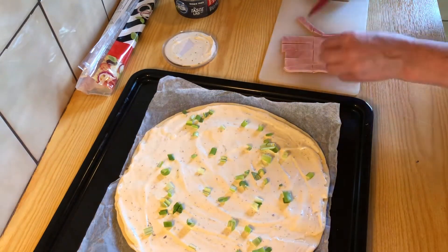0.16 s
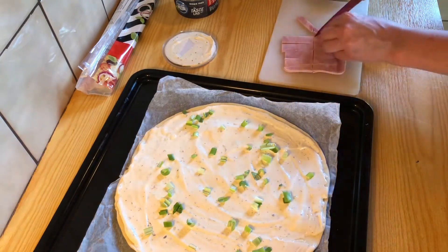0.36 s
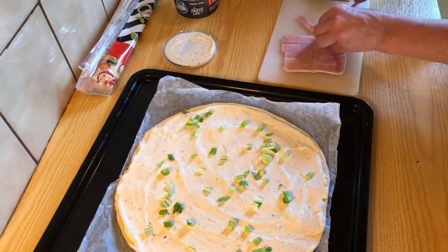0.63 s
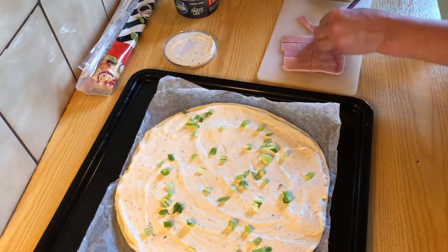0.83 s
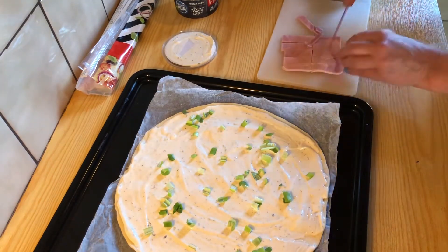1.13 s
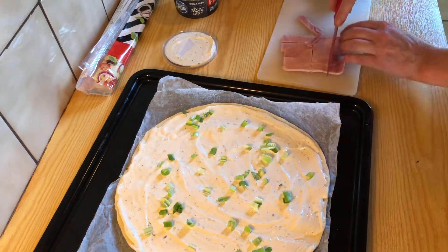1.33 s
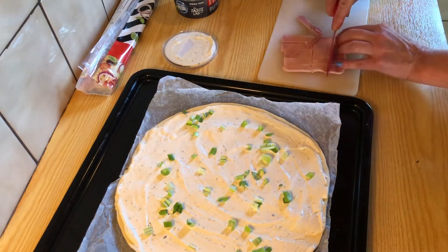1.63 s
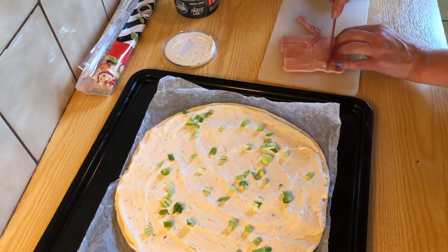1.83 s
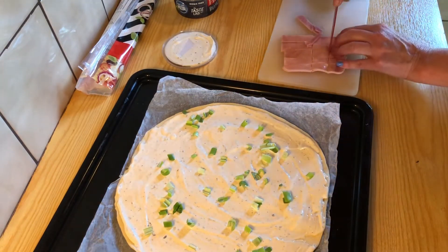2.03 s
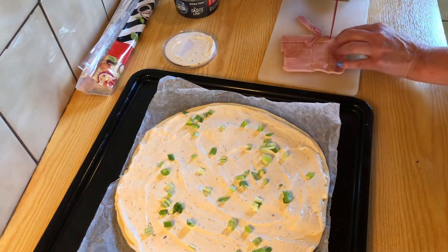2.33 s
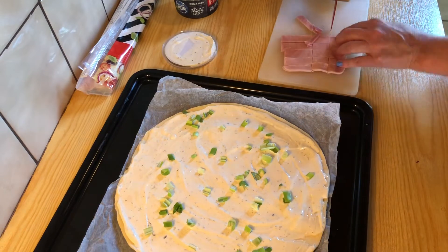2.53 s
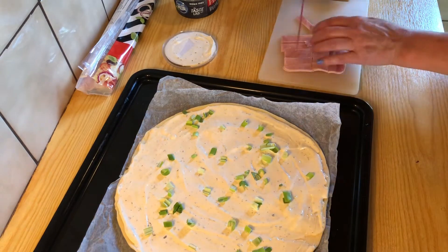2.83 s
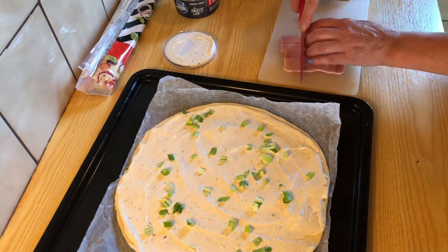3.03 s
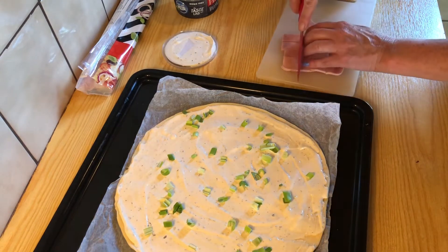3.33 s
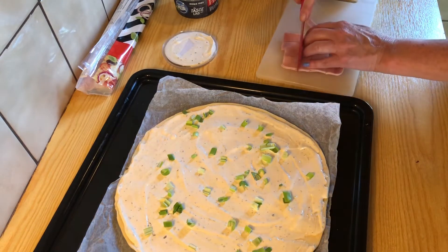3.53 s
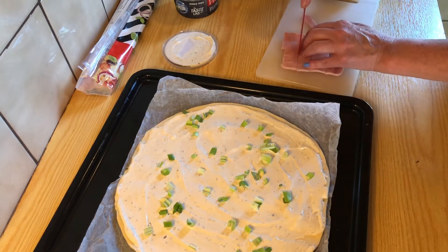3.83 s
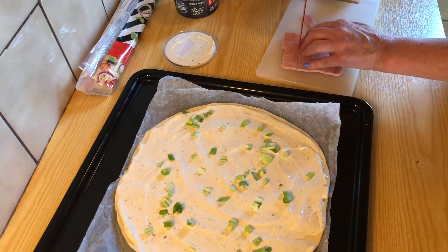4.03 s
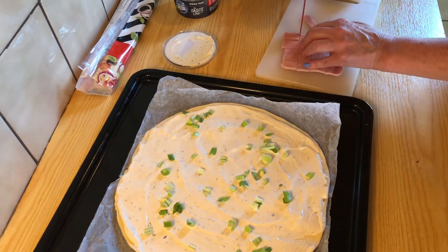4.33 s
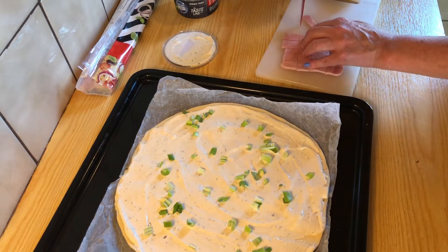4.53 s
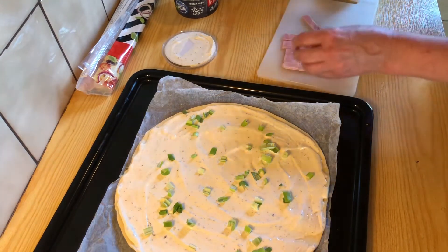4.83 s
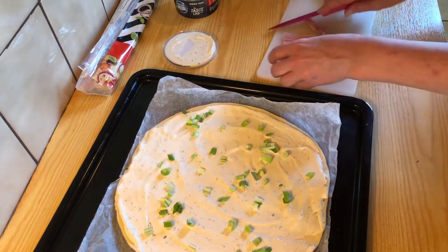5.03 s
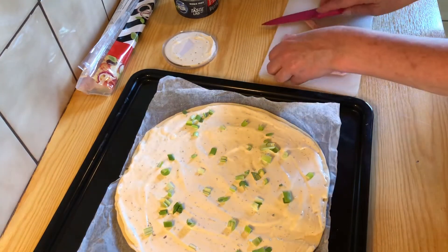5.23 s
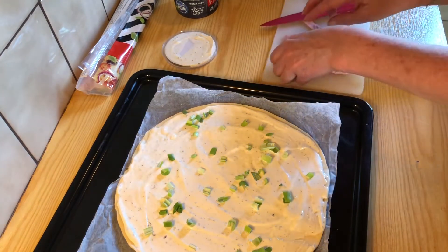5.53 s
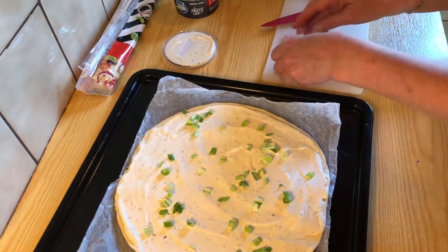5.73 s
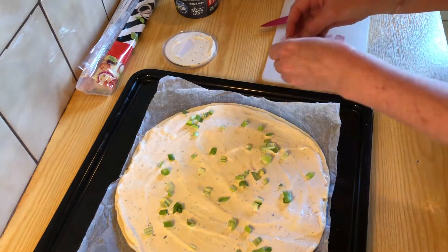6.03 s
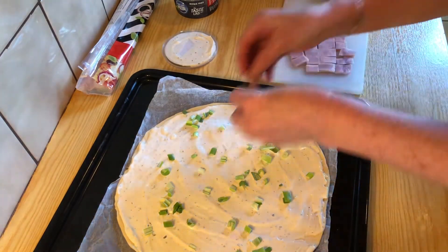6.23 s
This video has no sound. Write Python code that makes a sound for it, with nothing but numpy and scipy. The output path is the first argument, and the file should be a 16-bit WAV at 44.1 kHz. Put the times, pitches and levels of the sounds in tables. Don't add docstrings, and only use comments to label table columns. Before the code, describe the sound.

A small, quiet kitchen heard close up, with a faint steady refrigerator hum near 150 Hz, soft air noise and very low distant traffic fading after about 2 s. From 0 to 1 s, hands arrange moist ham slices: light rubs, sticky peels, small fingertip taps and a loose falling rasp around 0.7 s. From 1 s a knife slices on a plastic board with wet clicks, gritty rubbing and dull slips, crisp peels near 1.6 and 2 s, and a brief singing drag at 2.4 s. At 3 s the edge knocks, short and woody. Quieter strokes follow; at 4.4-4.6 s the blade squeaks and ends in a dull bump. At 4.95 s the handle thuds down, at 5.16 s the blade falls flat with a brighter rattling clack, both the loudest events. A sharp sticky snap comes at 5.33 s, then sparse soft rubs and peels settle until 6.3 s.

```python
import sys
import numpy as np
from scipy import signal
from scipy.fft import rfft, irfft, next_fast_len
from scipy.io import wavfile
from scipy.ndimage import uniform_filter1d

SR = 44100
rng = np.random.default_rng(int(sys.argv[2]) if len(sys.argv) > 2 else 0)


def undo_db(level):
    steps = np.asarray(level, float) / 20
    return 10 ** steps


def master_out(mix):
    frames = np.transpose(np.atleast_2d(mix))
    ceiling = np.clip(frames, -1, 1)
    pcm = np.round(ceiling * 32767).astype(np.int16)
    wavfile.write(sys.argv[1], SR, pcm)


N = 281358

# f/Hz, level/(dB per Hz)
RUB_COLOUR = [(710, -20.5), (1200, -2), (1610, -4), (1750, -7), (2100, -4.5), (3380, -8.5), (5850, -10),
              (14900, -21.5), (15800, -31)]
# f/Hz, width/Hz, level/dB
BOARD_MODES = [(725, 132, 2.5), (945, 59, 5.5), (1150, 120, 1), (1398, 51, 2.5), (1504, 190, -5.5),
               (2100, 1150, -12)]


def evened(x):
    return x / np.sqrt(np.mean(x ** 2) + 1e-20)


def read(points, hz):
    f, value = np.transpose(points)
    return np.interp(np.log(hz + 1), np.log(f + 1), value)


def colour(x, points):
    size = next_fast_len(len(x))
    gain = undo_db(read(points, np.fft.rfftfreq(size, 1 / SR)))
    return irfft(rfft(x, size) * gain, size)[:len(x)]


def ring(x, modes):
    out = np.zeros(len(x))
    for k, (hz, width_hz, db) in enumerate(modes):
        r = np.exp(-np.pi * width_hz / SR)
        poles = [1, -2 * r * np.cos(2 * np.pi * hz / SR), r * r]
        out += (-1) ** k * undo_db(db) * (1 - r) * signal.lfilter([1, 0, -1], poles, x)
    return out


def drift(hz):
    lowpass = signal.butter(2, hz, fs=SR, output="sos")
    return evened(signal.sosfilt(lowpass, rng.standard_normal(N + SR))[SR:])


def grit(per_s, spread_db, count=N):
    size = undo_db(spread_db * np.minimum(rng.exponential(1, count), 5)) * rng.standard_normal(count)
    return evened(size * (rng.random(count) < per_s / SR))


def add(mix, s, sound):
    part = mix[round(s * SR):][:len(sound)]
    part += sound[:len(part)]


def rumble():
    # t/s, level/dB
    traffic_db = [(0, -66), (1.4, -62.5), (2.4, -69), (3, -73), (6.4, -84)]
    band = signal.butter(2, [40, 115], "band", fs=SR, output="sos")
    low = signal.sosfilt(band, rng.standard_normal(N))
    return undo_db(np.interp(np.arange(N) / SR, *np.transpose(traffic_db))) * evened(low)


def kitchen_air():
    # f/Hz, level/(dB per Hz)
    air_colour = [(25, -4), (45, -17.5), (96, -4.5), (125, -10), (150, -12), (199, -21), (541, -16),
                  (603, -16.5), (1250, -24.5), (1630, -39), (4090, -36), (4810, -36.5), (13400, -43),
                  (15800, -44.5)]
    air_db, patch_db = -61.5, 0.98
    z = signal.stft(rng.standard_normal(N + 1024), SR, nperseg=1024, noverlap=768)[2]
    patches = uniform_filter1d(rng.standard_normal(z.shape), 12, 0)
    patches = evened(uniform_filter1d(patches, 12, 1))
    air = signal.istft(z * undo_db(patch_db * patches), SR, nperseg=1024, noverlap=768)[1][:N]
    return undo_db(air_db) * evened(colour(air, air_colour))


def fridge():
    # order, level/dB, waver/dB
    hum_orders = [(1, -69, 4.5), (2, -69, 3), (3, -55, .6), (4, -75, 2), (5, -77, 2), (12, -77, 2)]
    # f/Hz, width/Hz, level/dB
    whistles = [(4900, 90, -84.5), (6137, 25, -85.5)]
    motor_hz = 49.1
    turns = np.cumsum(motor_hz * (1 + .001 * drift(1.5))) / SR
    out = np.zeros(N)
    for order, db, waver_db in hum_orders:
        tone = np.sqrt(2) * np.sin(2 * np.pi * (order * turns + rng.random()))
        out += undo_db(db + waver_db * drift(6.7)) * tone
    for hz, width_hz, db in whistles:
        whistle = evened(ring(rng.standard_normal(N), [(hz, width_hz, 0)]))
        out += undo_db(db + 1.5 * drift(4.9)) * whistle
    return out


def thumps():
    # t/s, level/dB
    flexings = [
        (3, -48.5),
        (4.958, -44.5),
        (5.174, -44.5),
    ]
    out, t = np.zeros(N), np.arange(SR // 3) / SR
    swing = np.sin(2 * np.pi * 70 * t) + 1.34 * np.sin(2 * np.pi * 104 * t)
    swing *= (1 - np.exp(-t / 0.0025)) * np.exp(-t / 0.039)
    for s, db in flexings:
        add(out, s, undo_db(db) * swing)
    return out


def contact(rows):
    press_s, lift_db_per_s = 0.07, 280
    t = np.arange(0, N + 64, 64) / SR
    power = np.zeros((3, len(t)))
    for s, hold_s, effort_db, wet_db, weight_db in rows:
        swell = np.clip((t - s) / press_s + 1, 0, 1) ** 2
        swell *= undo_db(-lift_db_per_s * np.maximum(t - s - hold_s, 0))
        power += (swell * undo_db(effort_db + np.array([[wet_db], [0], [weight_db]]))) ** 2
    return np.array([np.interp(np.arange(N) / SR, t, p) for p in power])


def handling():
    # t/s, hold/s, effort/dB, wetness/dB, weight on the worktop/dB
    strokes = [(1.07, 0.2, -61.5, -2, -4.5), (1.35, 0.21, -66, -9.5, -2), (1.6, 0.023, -59.5, 3, -17),
               (1.66, 0.3, -66, -6.5, -15), (1.88, 0.18, -60.5, -6, -6), (2.1, 0.076, -65, -9, -3),
               (2.2, .14, -61, -7, -5), (2.39, 0.1, -60.5, -3, 3.5), (2.53, 0.061, -65, -7, 9),
               (2.84, 0.028, -70.5, 0, 3), (2.95, 0.14, -70, 1, 4), (3.45, 0.32, -69, -5, -12),
               (3.78, 0.22, -66.5, -4, -1.5), (4.06, 0.019, -66.5, 1, -5), (4.15, .2, -66, -9, 1),
               (4.41, 0.13, -60.5, -8.5, 5), (4.557, 0.0061, -47.5, -25, 6.5)]
    shuffles = [(0.01, 0.048, -73, 0, -10), (0.154, 0.13, -68, -4, -6), (0.327, 0.018, -69.5, -15, 6),
                (0.458, 0.035, -72.5, -17, 10), (0.597, 0.035, -67.5, -11, -12),
                (0.673, 0.13, -65.5, -2, -5), (0.73, 0.092, -62.5, -19, -0.5), (0.827, 0.012, -64, -14, 8),
                (.9, 0.087, -71, -4.5, 0), (4.618, 0.19, -70.5, -15, -2), (4.86, 0.16, -68, -5, -9),
                (5.058, 0.13, -59.5, -7.5, -10), (5.134, 0.15, -59, -12.5, 3), (5.336, 0.074, -62, -10, -1),
                (5.706, 0.026, -68, -15, 8), (5.787, 0.1, -67.5, -24, -1), (6.01, 0.097, -71, -15, -5),
                (6.254, 0.077, -81.5, 3.5, 8)]
    # f/Hz, width/Hz, level/dB
    worktop_modes = [(235, 81, 1.5), (332, 140, -9.5), (358.3, 21.5, 2.5), (419, 72, -3.5),
                     (474, 105, -7.5), (559, 54, -6.5)]
    rest_db, rest_sway_db = (-83, -70.5, -86), 1
    rest = np.array([undo_db(db + rest_sway_db * drift(3.8)) for db in rest_db])
    rub, board, top = np.sqrt(contact([*strokes, *shuffles]) + rest ** 2)
    flutter = undo_db(1.24 * drift(9.7))
    rub = rub * flutter * evened(colour(grit(6000, 0.41), RUB_COLOUR))
    board = board * flutter * evened(ring(grit(3000, 0.53), BOARD_MODES))
    top = top * evened(ring(grit(3000, 0.73), worktop_modes))
    return rub + board + top


def sing(count, first_hz, last_hz, width_hz, squeak):
    ends_db = -14
    u = np.linspace(0, 1, count)
    cycles = np.cumsum(first_hz + (last_hz - first_hz) * u) / SR
    turn = np.exp(2j * np.pi * (cycles + rng.random()))
    r = np.exp(-np.pi * width_hz / SR)
    shifted = grit(3500, 2.1, count=12000)[:count] / turn
    song = turn * signal.lfilter([1], np.convolve([1, -r], [1, -r]), shifted)
    shape = undo_db(ends_db * (2 * u - 1) ** 4) * np.minimum(1, 20 * u)
    return shape * evened(evened(song.real) + squeak * turn.real)


def drags():
    # t/s, length/s, level/dB, first f/Hz, last f/Hz
    blade_songs = [
        (2.39, 0.1, -59.5, 1150, 1150),
        (4.423, 0.094, -54.5, 1137, 1144),
        (4.516, 0.055, -52.5, 1148, 1113),
    ]
    slice_rasps = [
        (.65, .21, -61, 1450, 600),
    ]
    # t/s, length/s, level/dB, f/Hz, width/Hz
    wet_spots = [(0.045, 0.063, -66, 2850, 350), (.185, .025, -58.5, 1550, 300), (.19, .03, -72, 6300, 600),
                 (.24, 0.082, -62.5, 1260, 250), (.25, .02, -66, 3200, 600), (.275, .035, -66, 5600, 500),
                 (.29, .035, -68, 3150, 300), (0.316, .04, -64, 4500, 300), (.325, .02, -62, 2800, 800),
                 (.645, 0.054, -67, 2290, 300), (.7, 0.15, -70, 1990, 700), (.72, 0.081, -74, 4200, 900),
                 (0.861, 0.047, -76, 1900, 150), (1.065, .09, -61, 1120, 200),
                 (1.089, .1, -65.5, 2350, 300), (1.064, .03, -64, 4500, 400),
                 (1.192, 0.023, -57, 1500, 350), (1.192, .065, -58, 2100, 350),
                 (1.203, .03, -60, 5200, 1200), (1.411, 0.078, -71, 2000, 700), (1.46, .09, -60, 1330, 400),
                 (1.481, .05, -65, 2200, 600), (1.575, .085, -58, 1540, 250),
                 (1.603, 0.046, -57, 2970, 400), (3.04, .04, -60, 3000, 700), (3.005, .09, -54, 1500, 900),
                 (3.44, .1, -68, 2800, 1200), (2.955, .04, -71, 4200, 500), (2.961, .04, -67, 10500, 3000),
                 (4.393, 0.11, -66, 3110, 700), (4.421, 0.14, -62, 2000, 800),
                 (1.659, 0.19, -71, 2520, 500), (1.899, .04, -56.5, 3000, 500),
                 (4.529, 0.058, -55, 2400, 900), (4.57, 0.083, -61, 684, 90), (4.535, 0.041, -45, 270, 90),
                 (6.15, .23, -77, 10000, 4000), (3.26, 0.17, -74, 1500, 900)]
    out = np.zeros(N)
    for s, length_s, db, first_hz, last_hz in blade_songs:
        add(out, s, undo_db(db) * sing(round(length_s * SR), first_hz, last_hz, 100, 1.8))
    for s, length_s, db, first_hz, last_hz in slice_rasps:
        add(out, s, undo_db(db) * sing(round(length_s * SR), first_hz, last_hz, 260, .4))
    for s, length_s, db, hz, width_hz in wet_spots:
        add(out, s, undo_db(db - 3) * sing(round(length_s * SR), hz, hz, 1.5 * width_hz, 0))
    return out


def pings():
    # t/s, level/dB, f/Hz, t60/s
    ping_rows = [(.2335, -51.5, 1230, 0.05), (0.33, -55.5, 1270, 0.16), (2.041, -44.5, 4170, 0.028),
                 (2.043, -44.5, 2120, 0.037), (3.109, -52.5, 1650, 0.024), (3.13, -57, 1800, 0.012),
                 (1.063, -52.5, 1100, 0.039), (2.397, -47.5, 1150, 0.051), (3.61, -56, 1170, 0.025),
                 (1.8098, -57.5, 1800, .03), (.838, -54, 270, 0.041), (.815, -60, 960, .04),
                 (1.378, -65, 3000, .02), (4.553, -44, 300, 0.064), (5.266, -55, 1500, .05),
                 (4.7, -62, 1720, 0.069), (0.36, -70, 200, 0.053), (2.3, -52, 248, 0.031),
                 (3.7, -62, 370, 0.11), (6.06, -64.5, 2660, 0.068), (5.69, -65, 2100, .06),
                 (4.947, -54, 1820, 0.036), (5.152, -50, 2400, 0.11), (5.178, -44, 2130, 0.15),
                 (5.166, -46, 800, .12), (3.0, -59.5, 2450, 0.19), (5.326, -47, 1300, 0.014),
                 (5.327, -47, 2100, 0.025)]
    out, t = np.zeros(N), np.arange(8192) / SR
    for s, db, hz, t60_s in ping_rows:
        push = rng.standard_normal(len(t))
        push[20] += 14
        tone = evened(ring(push, [(hz, 140 + 5 / t60_s, 0)]))
        add(out, s, undo_db(db - 60 * t / t60_s) * (1 - np.exp(-t / 0.0006)) * tone)
    return out


def slips():
    # t/s, peak/dB, t60/s, tilt/(dB per octave)
    peel_rows = [(.0553, -55, .15, 0), (.1511, -52.5, 0.12, -2), (.1895, -50, .05, 2),
                 (.1999, -49.5, 0.05, 5), (.2798, -51, 0.09, 2.5), (.3277, -46.5, 0.13, 2.5),
                 (.9383, -60, .076, 1.1), (1.0635, -43.5, 0.17, 3.5), (1.071, -40.5, 0.048, 4),
                 (1.6212, -39.5, 0.036, 2), (1.9111, -39.5, 0.18, 1.5), (1.9834, -39.5, 0.35, 0.5),
                 (2.0423, -40.5, 0.02, 2.5), (2.4594, -51.5, 0.19, 7), (2.577, -53.5, .037, 3.5),
                 (2.7676, -58, .07, 3), (2.831, -47.5, 0.21, 3), (2.8968, -56, 0.093, 5),
                 (3.4494, -55, .07, -4), (3.6177, -58, .091, 2.1), (3.6745, -60, .07, 9),
                 (3.7554, -58.5, 0.085, 8), (3.8043, -62, .07, 14), (3.9094, -55, 0.14, 3),
                 (4.0594, -56, 0.063, 1.5), (4.7037, -53, 0.18, 5), (4.7666, -53.5, 0.042, 4),
                 (5.338, -50.5, 0.15, -2), (3.288, -63, .04, 8), (3.33, -65, .04, 7), (3.425, -62, .05, 2),
                 (5.4535, -49.5, 0.18, 0.5), (6.0531, -57, 0.3, 1.5), (5.81, -68, .04, 9)]
    slip_rows = [(.2518, -50, 0.11, -4), (1.1694, -48.5, 0.14, 2), (1.2126, -47.5, 0.049, -5),
                 (1.511, -49, 0.11, -7), (1.5948, -46.5, 0.15, -3), (1.8327, -47.5, 0.07, -1),
                 (1.8751, -59, .16, .1), (2.4014, -53, 0.071, -3.5), (2.4952, -40, 0.082, -9),
                 (3.0594, -53, 0.06, -4), (4.157, -51, 0.13, -5), (4.2403, -50, 0.069, -6.5),
                 (4.3994, -52, .082, -7), (4.4338, -56, .21, -5), (4.5476, -39.5, .14, -7.5),
                 (4.6768, -56, 0.062, 1), (5.6794, -53, 0.095, -7)]
    snap_rows = [
        (5.3268, -31, 0.044, -1),
    ]
    # rise/s, board share/dB, unevenness of colour/dB
    kinds = [(peel_rows, (.011, -15, 3)), (slip_rows, (.015, -13, 3)), (snap_rows, (.0005, -19, 1.2))]
    out, t = np.zeros(N), np.arange(8192) / SR
    octaves = np.log2(np.maximum(np.fft.rfftfreq(len(t), 1 / SR), 500) / 5000)
    for rows, (rise_s, board_db, uneven_db) in kinds:
        for s, db, t60_s, tilt_db, in rows:
            burst = grit(5000, 2.8, count=len(t))
            swell = np.sin(np.pi / 2 * t / rise_s) ** 2
            shape = np.where(t < rise_s, swell, undo_db(-60 * (t - rise_s) / t60_s))
            bumps = evened(uniform_filter1d(rng.standard_normal(len(octaves)), size=45))
            tilted = irfft(rfft(burst) * undo_db(tilt_db * octaves + uneven_db * bumps))
            hiss = evened(colour(tilted, RUB_COLOUR)) * shape
            body = ring(burst * shape, BOARD_MODES)
            body *= undo_db(board_db) / abs(body).max() * 1.1
            add(out, max(s - .6 * rise_s, 0), undo_db(db - 9.5) * (hiss + body))
    return out


def bending(t, hz, t60_s):
    lag_s = 1.7 / (hz + 90)
    age = np.maximum(t - lag_s, 0)
    fade = undo_db(-60 * age / (.024 + 8 / hz)) + 0.038 * undo_db(-60 * age / t60_s)
    return np.minimum(t / lag_s, 1) ** 3 * fade * np.sin(2 * np.pi * (hz * t + rng.random()))


def radiate(x, points):
    z, hz = rfft(x), np.fft.rfftfreq(len(x), 1 / SR)
    total, k = np.cumsum(abs(z) ** 2), np.arange(len(z))
    low = (k * .9).astype(int)
    high = np.minimum((k * 1.11).astype(int) + 2, len(z) - 1)
    outline = np.sqrt((total[high] - total[low]) / np.maximum(high - low, 1) + 1e-12)
    return irfft(z / outline * undo_db(read(points, hz)), len(x))[:len(x) * 3 // 4]


def knock(db, tick_db, radiated, modes, bounces):
    # f/Hz, level/(dB per Hz)
    scatter_colour = [(80, -20), (250, -3), (900, -4), (2200, -15), (4000, -32), (15000, -55)]
    scatter_db, scatter_rise_s, scatter_t60_s = -20, 0.0046, 0.18
    t = np.arange(SR // 3) / SR
    clear = sum(undo_db(mode_db) * bending(t, hz, t60_s) for hz, mode_db, t60_s in modes)
    close_hz = np.geomspace(130, 5000, num=70) * rng.uniform(1.0, 1.02, 70)
    mass = sum(undo_db(read(radiated, hz)) * hz * bending(t, hz, 0.023) for hz in close_hz)
    tick = evened(colour(rng.standard_normal(len(t)), RUB_COLOUR))
    tick *= np.exp(-t / 0.0064) + 0.053 * np.exp(-t / 0.032)
    blow = 0.95 * clear / abs(clear).max() + 0.39 * mass / abs(mass).max() + undo_db(tick_db) * tick
    spread = undo_db(scatter_db - 60 * t / scatter_t60_s) * (1 - np.exp(-t / scatter_rise_s))
    out = blow + spread * evened(colour(grit(2500, 2.8, count=len(t)), scatter_colour))
    soft = signal.sosfilt(signal.butter(2, 950, fs=SR, output="sos"), blow)
    for s, bounce_db in bounces:
        add(out, s, undo_db(bounce_db) * soft[:len(t) - round(s * SR)])
    out = radiate(out, radiated)
    return undo_db(db) * out / abs(out).max()


def edge_knock():
    # f/Hz, level/(dB per Hz)
    edge_colour = [(100, -49), (170, -8), (230, -0.5), (301, -19), (379, -6), (602, -31), (694, -15.5),
                   (891, -21.5), (1120, -14.5), (1420, -15.5), (3980, -43.5), (7030, -45), (12000, -50),
                   (15600, -81), (22000, -120)]
    # f/Hz, level/dB, t60/s
    edge_modes = [(246, 7, .14), (369, 0, 0.28), (664, -22, .09), (1350, -12, .15), (2350, -12, .15)]
    # t after the blow/s, level/dB
    edge_bounces = [(.005, -1), (0.013, -3), (.0215, -9), (.05, -18)]
    return knock(-25, -15.5, edge_colour, edge_modes, edge_bounces)


def handle_knock():
    # f/Hz, level/(dB per Hz)
    handle_colour = [(70, -33), (120, -8), (220, 0.5), (320, -7.5), (460, -5.5), (620, -13.5), (820, -12),
                     (960, -5), (1150, -14), (1550, -12.5), (2150, -18.5), (3200, -26), (5000, -39.5),
                     (8200, -34.5), (15000, -61)]
    # f/Hz, level/dB, t60/s
    handle_modes = [(243, 14, 0.086), (380, 6, 0.25), (403, -4.5, 0.29), (815, -16, .2), (960, 10, .05),
                    (1290, -16, .2), (1530, 2, 0.05), (1990, -20, .15)]
    # t after the blow/s, level/dB
    handle_bounces = [(.0042, -1), (.0085, -8), (.017, -11), (0.036, -22)]
    return knock(-18, -18, handle_colour, handle_modes, handle_bounces)


def flat_knock():
    # f/Hz, level/(dB per Hz)
    flat_colour = [(70, -36), (150, -3), (260, -11.5), (410, -1.5), (500, -16), (600, -3.5), (730, -4.5),
                   (950, -3.5), (1190, -5), (1550, -4), (1800, -12), (2150, -7), (2770, -22), (4000, -29.5),
                   (15000, -64)]
    # f/Hz, level/dB, t60/s
    flat_modes = [(415, -11, .3), (585, -15, .15), (723, 1, .1), (899, -10, .15), (1177, 8, .12),
                  (1530, -8, .1), (1615, -7, .08), (1820, -16, .1), (2100, -9.5, .2), (2240, -1, .2)]
    # t after the blow/s, level/dB
    flat_bounces = [(.008, 0), (.0145, -1), (.026, -9)]
    return knock(-18, -23, flat_colour, flat_modes, flat_bounces)


def room(x):
    # f/Hz, t60/s
    room_t60_s = [(100, 0.34), (300, 0.4), (1200, 0.23), (3000, 0.28), (10000, 0.13)]
    taps = np.zeros(SR // 2)
    at = np.arange(300, len(taps) - 20, 20)
    taps[at + rng.integers(0, 20, len(at))] = rng.choice([-1., 1.], len(at))
    hz, t, z = signal.stft(taps, SR, nperseg=256)
    decay = undo_db(-60 * t / read(room_t60_s, hz)[:, None]) * np.minimum(t / 0.017, 1)
    tail = signal.istft(z * decay, SR, nperseg=256)[1]
    return signal.fftconvolve(x, tail / np.linalg.norm(tail))[:N]


def scene():
    background = rumble() + kitchen_air() + fridge() + thumps() + handling() + drags()
    near = pings() + slips()
    add(near, 2.9938, edge_knock())
    add(near, 4.952, handle_knock())
    add(near, 5.1581, flat_knock())
    return (background + near + undo_db(-14) * room(near))[None]


def top_cut(x):
    return signal.sosfilt(signal.butter(12, 15900, fs=SR, output="sos"), x)


def record(dry):
    cut = signal.sosfilt(signal.butter(6, 39, "high", fs=SR, output="sos"), dry)
    lowpass = signal.firwin(511, 15800, window=("kaiser", 9), fs=SR)
    mix = signal.oaconvolve(cut, lowpass[None], "same")
    return top_cut(mix)


dry = scene()
out = record(dry)
master_out(out)
```